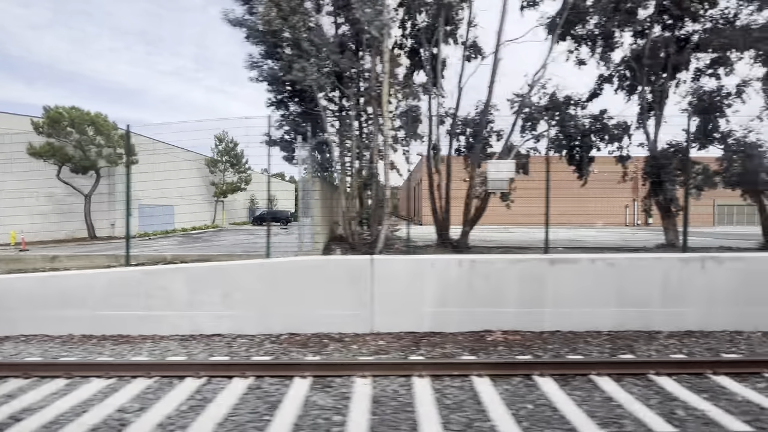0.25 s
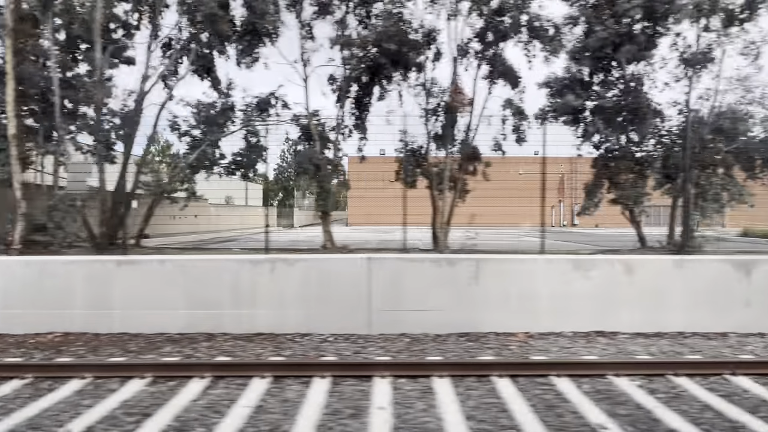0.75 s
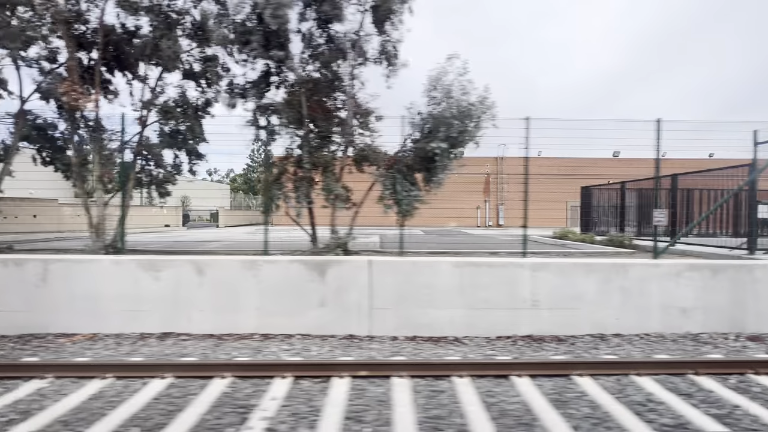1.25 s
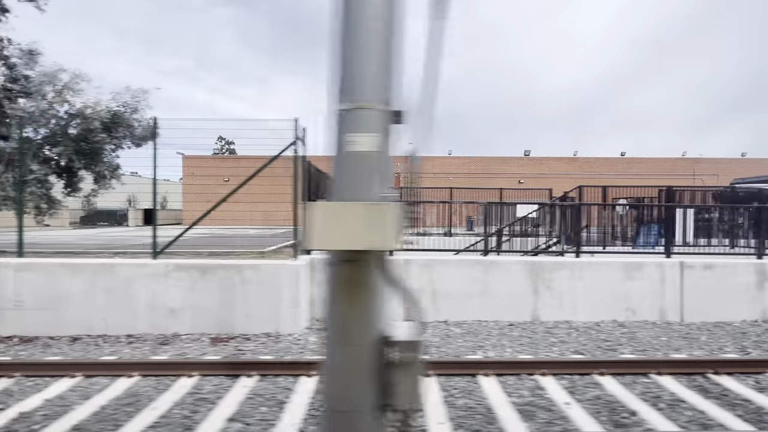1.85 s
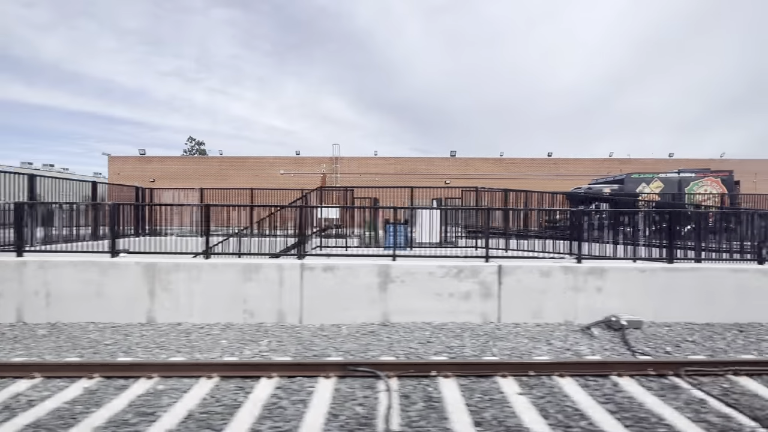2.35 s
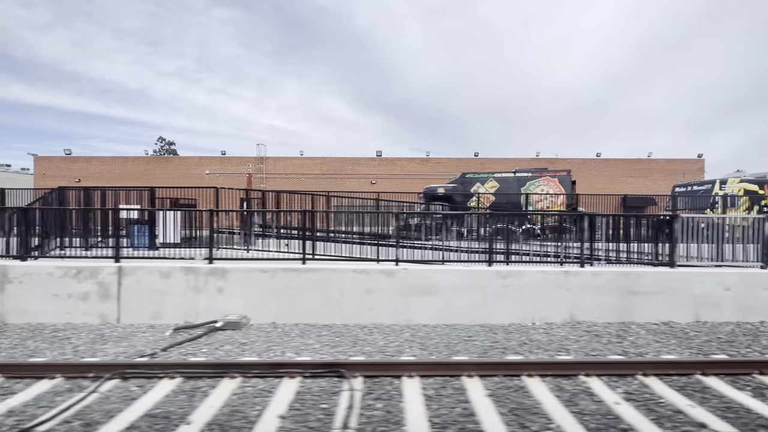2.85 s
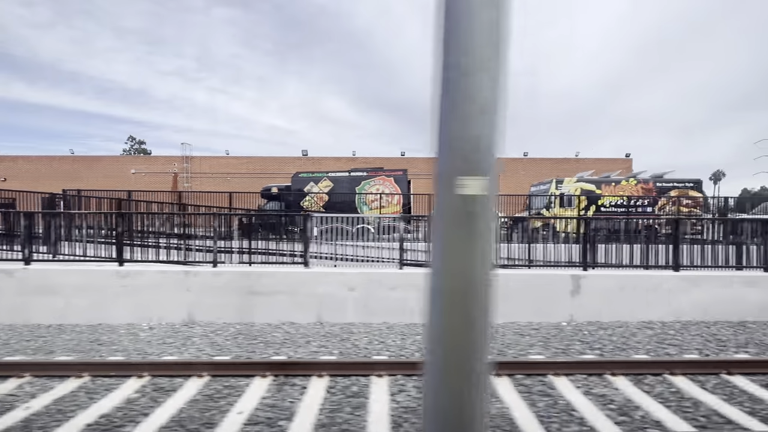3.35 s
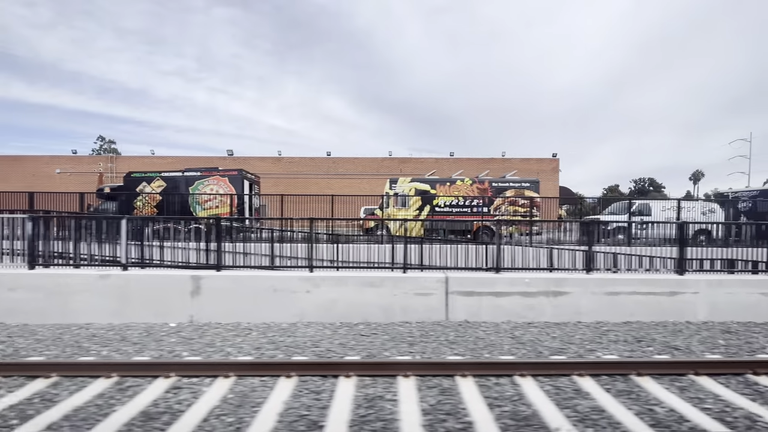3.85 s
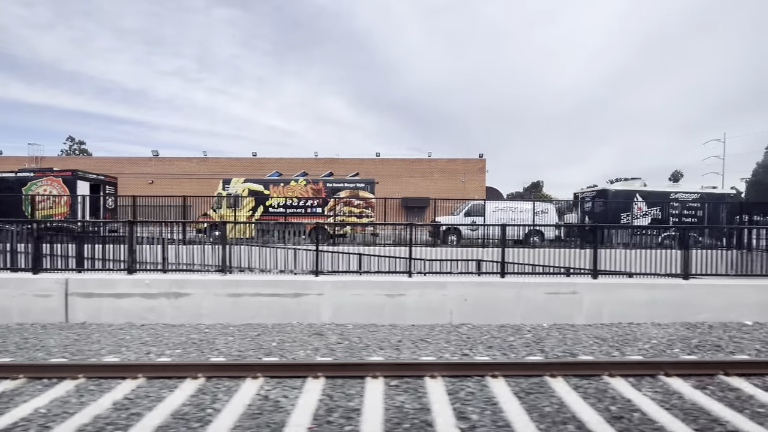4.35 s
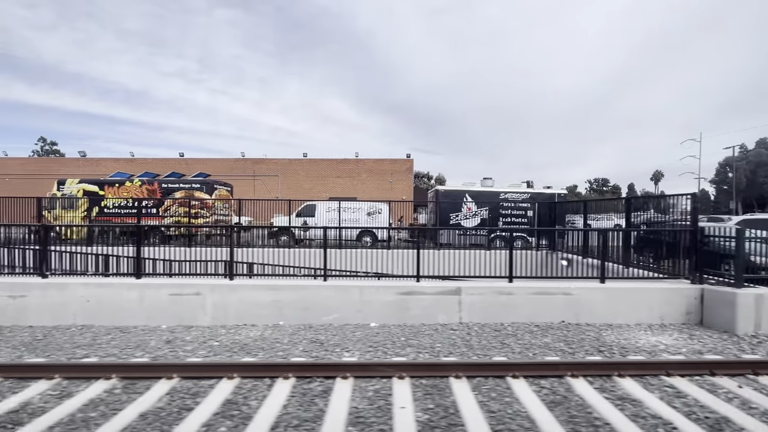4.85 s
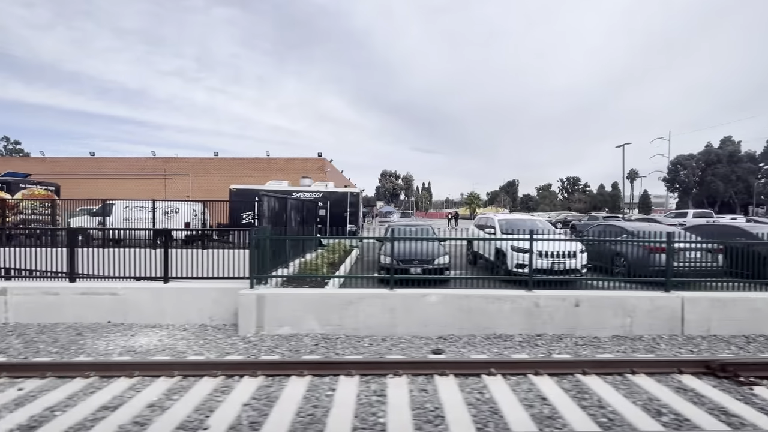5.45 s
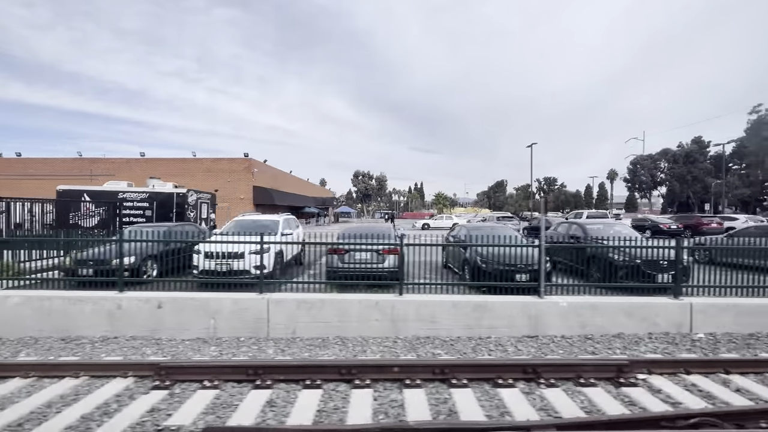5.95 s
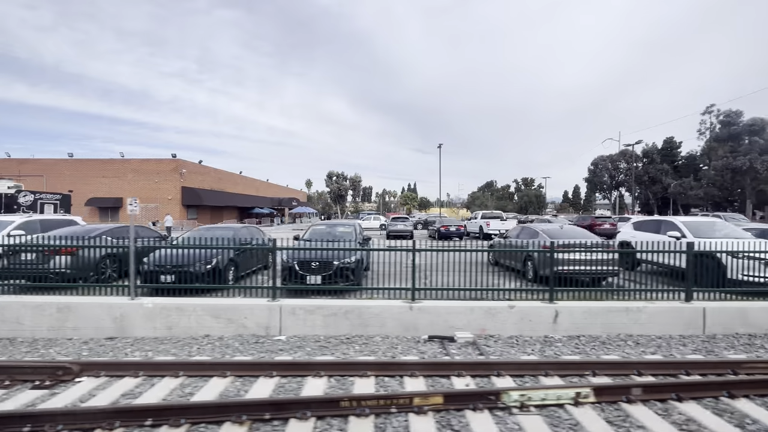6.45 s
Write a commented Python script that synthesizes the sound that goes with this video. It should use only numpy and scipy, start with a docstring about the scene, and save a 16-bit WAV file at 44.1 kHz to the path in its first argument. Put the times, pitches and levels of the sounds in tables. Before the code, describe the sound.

Inside a moving light rail car, deep rumble and low hum, clusters of heavy wheel thuds and knocks, steady air hiss, faint trim ticks.

```python
"""Inside a light rail car at steady speed. Rough rail excites the low modes of the cabin, which boom over a wavering hum;
impulses at uneven stretches thud, knock and heave the body, and corrugated rail makes the wheels sing.
Rails and wheels roar in the middle range as resonantly filtered noise that flutters and wanders in pitch.
Ventilation and passing air hiss evenly, with a thin sizzle above; a loose piece of trim squeaks once
and ticks very slightly to the right."""
import sys
import numpy as np
from scipy import signal
from scipy.fft import rfft, irfft, next_fast_len
from scipy.io import wavfile
from scipy.ndimage import uniform_filter1d, map_coordinates

SR = 44100
rng = np.random.default_rng(int(sys.argv[2]) if len(sys.argv) > 2 else 0)


def to_wav(s):
    """Save 16-bit WAV."""
    ch = np.atleast_2d(s).T  # columns
    pcm = np.round(np.clip(ch, -1, 1) * 32767)  # PCM
    wavfile.write(sys.argv[1], SR, pcm.astype(np.int16))


N = 295470

# roughness of the plain rail, smoother at the end: (time [s], level [dB])
RAIL_ROUGHNESS = [(0, -3), (.4, 5.5), (.53, 0.5), (.7, 0.5), (1.25, 2), (1.36, 0.5), (1.5, 1), (1.7, 2.5),
                  (1.9, -1.5), (2.3, 0), (2.8, 0), (3.05, -1), (3.5, 3.5), (3.78, 1), (4.2, 5.5),
                  (4.42, -2), (4.7, 4), (5.22, -0.5), (5.6, 1.5), (5.78, -1.5), (6.0, -4.5), (6.7, -5.5)]
# rolling roar of wheels and rails: (time [s], level [dB])
ROLLING_ROAR = [(0, -30.5), (.7, -26.5), (1.25, -27.5), (1.55, -28), (1.95, -27.5), (2.7, -27),
                (3.7, -30.5), (4.5, -29), (5.3, -30), (6.7, -31.5)]
# bogies on uneven stretches:
# (start [s], hold [s], cabin boom level [dB], floor growl level [dB], wheel roar level [dB])
UNEVEN_STRETCHES = [(0.01, 0.32, -23.5, -21, -36.5), (0.6, 0.084, -32, -27, -24),
                    (0.737, 0.12, -21, -22, -27), (0.875, 0.13, -39, -22.5, -27.5),
                    (1.556, 0.056, -21, -35, -50), (2.177, 0.06, -18.5, -27, -31),
                    (2.644, 0.058, -23, -35, -44), (3.862, 0.42, -26, -28.5, -47),
                    (4.448, 0.13, -20, -25, -38), (4.566, 0.22, -36, -21, -34),
                    (5.245, 0.072, -38, -36, -47), (5.825, 0.021, -18, -49, -49)]
# a wheel strikes a weld or dip: (time [s], low thud reference level [dB], steel knock force level [dB])
WHEEL_BLOWS = [(0.146, -12.5, -19), (0.183, -12, -29), (0.226, -9.5, -34), (0.286, -17, -28),
               (0.342, -13, -27), (0.431, -17, -35), (0.628, -7, -19.5), (0.659, -8.5, -26),
               (0.742, -8, -24), (0.778, -8.5, -17), (0.803, -9, -18.5), (0.91, -11.5, -24),
               (0.974, -14, -27), (1.3, -12.5, -31), (1.403, -8, -29), (1.461, -12, -36),
               (1.564, -15.5, -41), (2.184, -26, -31), (2.535, -11.5, -30), (3.88, -13, -39),
               (3.949, -11.5, -30), (4.007, -21, -37), (4.091, -6.5, -28), (4.115, -8.5, -21),
               (4.186, -12, -40), (4.227, -18, -36), (4.312, -14, -39), (4.362, -13, -34),
               (4.585, -8, -20.5), (4.639, -4.5, -26), (4.72, -12, -25), (4.753, -12.5, -22),
               (4.831, -9.5, -24), (4.915, -14.5, -34), (5.264, -15, -36), (5.324, -14.5, -36),
               (5.425, -11.5, -37), (5.523, -17.5, -33), (5.837, -31, -45)]
# the car body drops onto its springs: (time [s], force level [dB])
BODY_DROPS = [(0.325, -9.5), (0.68, -19), (0.915, -9.5), (1.11, -17), (1.41, -17), (1.69, -18),
              (1.8, -22.5), (2.1, -19), (2.48, -17), (2.84, -17.5), (2.97, -16.5), (3.7, -20), (4.1, -8.5),
              (4.905, -14), (5.31, -16), (5.63, -22)]
# corrugated patches of rail; the length is two standard deviations of a Gaussian crossing:
# (middle [s], length [s], pitch [Hz], waver [Hz], level [dB])
CORRUGATED_PATCHES = [(0.065, 0.079, 110.4, 6.9, -14), (0.26, 0.27, 109.1, 4.1, -16),
                      (0.7, 0.14, 166.8, 12, -21), (0.791, 0.08, 305, 22, -20.5),
                      (0.835, 0.24, 401, 24, -28), (0.767, 0.32, 694.3, 24, -28.5),
                      (0.899, 0.2, 762, 23.5, -31.5), (0.816, 0.13, 955, 50.6, -28),
                      (0.739, 0.26, 1295, 70, -37), (1.201, 0.15, 755, 10, -31),
                      (1.401, 0.14, 935, 15, -37), (1.98, 0.32, 776, 44, -30), (2.0, 0.4, 935, 64, -37.5),
                      (2.36, 0.14, 103.8, 3.7, -16.5), (2.6, 0.18, 227, 12, -28),
                      (1.48, 0.2, 152, 24, -23.5), (2.719, 0.12, 100, 4.04, -20.5),
                      (2.794, 0.2, 967, 35.5, -35.5), (3.979, 0.12, 107.9, 3.4, -17.5),
                      (4.2, 0.43, 219, 13.4, -23.5), (4.42, 0.1, 680, 13, -30),
                      (4.72, 0.22, 384, 40, -29.5), (4.756, 0.28, 719, 56, -29.5),
                      (4.862, 0.2, 274.2, 12.2, -26.5), (5.44, 0.16, 214, 15.3, -27)]
# sharpest ticks of the loose trim: (time [s], force level [dB])
SHARP_TICKS = [(0.2214, -41), (0.9228, -43), (1.02, -46), (1.0755, -40), (1.305, -43), (2.27, -53),
               (2.4912, -41), (3.0061, -45), (3.94, -53), (4.1599, -42.5), (4.4677, -42), (4.565, -46),
               (4.64, -43), (4.7346, -41), (4.82, -41), (5.0973, -41), (5.2604, -42), (5.35, -41.5),
               (5.495, -42), (5.6615, -42), (5.71, -44), (6.105, -43), (6.4153, -46)]

# resonances of cabin air and floor panels: (frequency [Hz], width [Hz], lift [dB])
CABIN_MODES = [(52.2, 3.9, 7), (65, 11, 7), (95.6, 8.3, 3), (108.6, 7.6, 5), (136.2, 11, 6.5),
               (164.8, 11.3, 5), (197.5, 18, 3), (222, 31.5, 6), (271, 10.7, 5.5), (308, 14, 6.5),
               (354.5, 17, 4), (412.6, 15, 4.5)]
# resonances of wheels and rails: (frequency [Hz], width [Hz], lift [dB])
WHEEL_MODES = [(676, 57, 5.5), (770, 64, 5.5), (948, 42, 5.5), (1010, 45, 4.5), (1110, 35, -2),
               (1550, 90, 1)]
# resonances of air duct and vent grille: (frequency [Hz], width [Hz], lift [dB])
GRILLE_MODES = [(329.6, 22, 4.5), (411.5, 14, 5), (1810, 160, 3), (2024, 100, 4.5), (2220, 220, 2.5),
                (4786, 130, 7), (5070, 130, 5.5), (8665, 100, -1.5)]
# ring of the trim: (frequency [Hz], width [Hz], lift [dB])
TRIM_MODES = [(4810, 320, 14), (8800, 300, 7)]

# broad spectra, before the resonances: (frequency [Hz], relative level [dB per Hz])
BOOM_SPECTRUM = [(12, -56), (25, -29), (36, -12), (50, -11.5), (68, -6), (82, -6.5), (112, -3), (135, -16),
                 (180, -21.5), (400, -71)]
GROWL_SPECTRUM = [(70, -34), (110, -15.5), (145, 3.5), (190, -1.5), (270, -6), (400, -10), (520, -17.5),
                  (800, -21), (2000, -71.5)]
ROAR_SPECTRUM = [(200, -23), (400, -0.5), (540, 0), (700, -3), (900, -5), (1200, -4), (1600, -13),
                 (2400, -23.5), (5000, -57.5)]
JOLT_SPECTRUM = [(30, -41), (70, -5), (130, 5.5), (220, -0.5), (330, -10), (900, -35), (4000, -59)]
SHUDDER_SPECTRUM = [(20, -60), (55, -6.5), (110, -3.5), (170, 4.5), (250, -7), (330, -19), (800, -38.5),
                    (4000, -73)]
KNOCK_SPECTRUM = [(150, -17), (350, 12.5), (550, -11.5), (750, 2.5), (1250, -5), (1800, -13), (4000, -49)]
HEAVE_SPECTRUM = [(18, -57), (35, -13.5), (55, 2.5), (72, -3), (130, -24.5), (400, -65)]
HISS_SPECTRUM = [(22, -18), (70, 9), (135, -3.5), (230, 7), (360, 7.5), (550, -3.5), (1000, 2),
                 (1500, -0.5), (2250, -6.5), (2700, -11), (3600, -13), (4400, -18), (6100, -21),
                 (7600, -30), (8700, -27), (10500, -36), (12000, -66.5)]
TICK_SPECTRUM = [(1500, -22), (3500, -17), (5000, 6.5), (7600, 0), (8700, 1), (10600, -5), (12000, -9)]

# likeness of the field at left and right, limited to +-0.99: (frequency [Hz], correlation [1])
FIELD_CORRELATION = [(50, 3), (75, 6.5), (110, 3.4), (170, 0.4), (235, 0.66), (330, -0.53), (390, 0.04),
                     (580, -0.5), (820, 0), (1450, -.5), (1950, 0.26), (3800, -0.13), (4800, 0.15),
                     (7700, -0.4), (9000, 0)]
# left minus right: (frequency [Hz], level difference [dB])
FIELD_BALANCE = [(62, -1.9), (140, -0.6), (220, 0), (320, 0), (700, 0), (1150, 4.5), (2000, 4), (2600, 1.5),
                 (4200, 4), (4900, 9.5), (6000, 10), (7400, -0.5), (8600, -6), (10200, -10.5)]

BOOM_DB, GROWL_DB = -24.5, -26.5  # on rail of roughness 0 dB
WHEEL_TURN_HZ, THROB_DB = 6.3, 0.5  # slightly oval wheels press harder once a turn
SURGE_ATTACK_S, SURGE_RELEASE_S = 0.017, 0.048
JOLT_DB, SHUDDER_DB = -1, -2.5  # relative to each low thud's reference level
HUM_HZ, HUM_DB = 97, -3.5  # level relative to the boom
HUM_FLUTTER_DB, HUM_WAVER = 4, 0.02597  # spread of its level, and of its pitch as a share
AIR_DB = -28.5  # settled ventilation
RUSH_DB, RUSH_FADE_S = 2, 0.69  # the air is a little louder at first and settles
SIZZLE_DB, SIZZLE_HOLD_S, SIZZLE_FADE_S = -50, 0.29, 0.12  # a bright hiss at first
SIZZLE_SHAKE_DB = -61.5  # the part kept up by the shaking floor, at shake 1
SQUEAK_S, SQUEAK_HZ, SQUEAK_DB = 0.21, 4740, -35  # force level; the trim rubs once
CEILING, TOP_HZ = 0.92, 10850  # peak amplitude limit, and edge of the pass band


def ride():
    """Superposed power: plain rail and uneven stretches add; the bass throbs at the wheels' rotation rate."""
    t = np.arange(N) / SR
    rough_db = curve(RAIL_ROUGHNESS)
    plain_db = [BOOM_DB + rough_db, GROWL_DB + rough_db, curve(ROLLING_ROAR)]
    power = undb(plain_db) ** 2
    for start, hold, *levels_db in UNEVEN_STRETCHES:
        attack = np.clip((t - start) / SURGE_ATTACK_S, 0, 1)
        release = np.exp(-np.maximum(t - start - hold, 0) / SURGE_RELEASE_S)
        power = power + np.outer(undb(levels_db), attack * release) ** 2
    boom, growl, roar = np.sqrt(power)
    throb = undb(THROB_DB * np.cos(2 * np.pi * WHEEL_TURN_HZ * t))
    return boom * throb, growl * throb, roar


def running_gear(boom_gain, growl_gain, roar_gain):
    """Forced vibration: rail roughness drives the cabin air, the floor panels and the wheels themselves."""
    boom = colour(sound_field(noise()), BOOM_SPECTRUM, CABIN_MODES)
    boom = sustained(boom, span_s=0.15)
    # the floor panels are shaken in uneven jolts
    jolts = noise() * undb(2.1 * walk(rate=45))
    growl = colour(sound_field(jolts), GROWL_SPECTRUM, CABIN_MODES)
    growl = sustained(growl, span_s=0.17)
    # the contact patch shifts on the tread, so the roar wavers and turns gritty
    roar = colour(sound_field(noise()), ROAR_SPECTRUM, WHEEL_MODES)
    roar = wander(roar, share=0.012, rate=9)
    roar = flutter(roar, depth_db=2.5, rate=24, count=12)
    roar = sustained(roar, span_s=0.24) * undb(0.5 * walk(rate=55))
    return boom * boom_gain + growl * growl_gain + roar * roar_gain


def wheel_thuds():
    """Impulsive excitation: blows jolt and shudder the cabin and knock the wheels; body drops make it heave."""
    lows = [(s, low_db) for s, low_db, _ in WHEEL_BLOWS]
    highs = [(s, knock_db) for s, _, knock_db in WHEEL_BLOWS]
    shudder_force = blows(lows, rise_s=0.0034, t60_s=0.18) * undb(SHUDDER_DB)
    knock_force = blows(highs, rise_s=0.0028, t60_s=0.17)
    heave_force = blows(BODY_DROPS, rise_s=0.009, t60_s=0.3)
    jolts = jolt(lows, JOLT_SPECTRUM, CABIN_MODES) * undb(JOLT_DB)
    shudders = strike(shudder_force, SHUDDER_SPECTRUM, CABIN_MODES)
    knocks = strike(knock_force, KNOCK_SPECTRUM, WHEEL_MODES)
    heaves = strike(heave_force, HEAVE_SPECTRUM, CABIN_MODES)
    return jolts + shudders + knocks + heaves


def rail_song():
    """Periodic excitation: wheels sing while crossing rail-head ripples; long ones drone, short ones howl."""
    t = np.arange(N) / SR
    song = np.zeros((2, N))
    for middle, length, hz, waver_hz, db in CORRUGATED_PATCHES:
        near = np.abs(t - middle) < 2 * length
        age = t[near] - middle
        crossing = np.exp(-(2 * age / length) ** 2 / 2) * undb(db)
        for side, uneven in enumerate(rng.standard_normal(size=(2, 128))):
            knots = (np.arange(len(uneven)) - len(uneven) / 2) / waver_hz
            pitch = hz + waver_hz / 2 * np.interp(age, knots, uneven)
            cycles = np.cumsum(pitch) / SR + rng.random()
            song[side, near] += np.sqrt(2) * crossing * np.sin(2 * np.pi * cycles)
    return sound_field(song)


def cabin_hum(boom_gain):
    """Tonal hum: a low sine near 97 Hz wavers in pitch, falters, and swells with the boom."""
    pitch = HUM_HZ * (1 + HUM_WAVER * walk(rate=8))
    phase = 2 * np.pi * np.cumsum(pitch) / SR
    hum = unit(np.sin(phase) * undb(HUM_FLUTTER_DB * walk(rate=20)))
    return hum * boom_gain * undb(HUM_DB)


def trim_rattle(shake, pan_db, chatter_db, spread_db, follow):
    """Contact noise: loose trim ticks sharply, and chatters at random, louder the harder the floor shakes."""
    chance = rng.random((150, 2))
    times = chance[:, 0] * (N - 1) / SR
    shake_db = 20 * np.log10(shake[(times * SR).astype(int)])
    sizes_db = chatter_db + spread_db * chance[:, 1] + follow * shake_db
    ticks = blows(SHARP_TICKS, rise_s=0.00049, t60_s=0.087)
    chatter = blows(zip(times, sizes_db), rise_s=0.00036, t60_s=0.088)
    lean = undb(np.array([[pan_db], [-pan_db]]) / 2)
    ring = unit(colour(noise(), TICK_SPECTRUM, TRIM_MODES) * lean)
    return np.hypot(ticks, chatter) * ring


def trim_squeak():
    """Friction noise: a brief, thin squeak of plastic on metal, as noise with one narrow resonance."""
    spectrum = [(2500, -27), (3700, -5), (5200, -9), (8000, -24), (11000, -36)]
    rub = unit(colour(noise(), spectrum, [(SQUEAK_HZ, 200, 14)]))
    return rub * blows([(SQUEAK_S, SQUEAK_DB)], rise_s=0.008, t60_s=0.14)


def ventilation():
    """Flow noise: turbulent air hisses through the vents and along the windows."""
    hiss = colour(sound_field(noise()), HISS_SPECTRUM, GRILLE_MODES)
    hiss = flutter(hiss, depth_db=1.0, rate=16)
    hiss = reflections(hiss, db=-16.5, t60_s=0.15)
    rush_db = RUSH_DB * np.exp(-np.arange(N) / SR / RUSH_FADE_S)
    return hiss * undb(AIR_DB + rush_db)


def sizzle(shake):
    """Amplitude-modulated noise: a thin high hiss soon dies down and stirs again as the floor shakes."""
    fade = np.exp(-np.maximum(np.arange(N) / SR - SIZZLE_HOLD_S, 0) / SIZZLE_FADE_S)
    gain = np.hypot(undb(SIZZLE_DB) * fade, undb(SIZZLE_SHAKE_DB) * shake)
    spectrum = [(2500, -12.0), (4800, 5.5), (8000, -1.0), (11000, -12)]
    return unit(colour(sound_field(noise()), spectrum)) * gain


def blows(table, rise_s, t60_s):
    """Transient force: each blow builds quickly and decays exponentially."""
    force = np.zeros(N)
    age = np.arange(SR) / SR
    shape = (1 - np.exp(-age / rise_s)) * undb(-60 * age / t60_s)
    for s, db in table:
        start = max(int(s * SR), 0)
        force[start:start + SR] += undb(db) * shape[:N - start]
    return force


def jolt(table, spectrum, modes):
    """Impulse response: each clean push alone peaks at its level and rings on in the modes."""
    pushes = np.zeros(N)
    for s, db in table:
        pushes[int(s * SR)] += undb(db)
    lone, struck = colour(np.array([signal.unit_impulse(N), pushes]), spectrum, modes)
    return struck / np.max(np.abs(lone))


def strike(force, spectrum, modes):
    """Resonant response: a noisy shudder follows the force and rings on in the modes."""
    shudder = sustained(colour(sound_field(noise()), spectrum), span_s=0.018)
    flat = [(1, 0), (SR, 0)]
    steady, struck = colour(np.array([shudder, shudder * force]), flat, modes)
    return struck / np.std(steady)  # unforced shudder sets the reference level


def flutter(x, depth_db, rate, count=18):
    """Turbulence: neighbouring bands swell and fade independently; the outer two take in all beyond them."""
    centres = np.geomspace(400, 400 * 1.2 ** count, count)
    size = next_fast_len(N)
    spectrum = rfft(x, size)
    hz = np.arange(size // 2 + 1) * SR / size
    out = 0
    for band in np.eye(count):
        part = irfft(spectrum * np.interp(hz, centres, band), size)[:, :N]
        out = out + part * undb(depth_db * walk(rate))
    return out


def wander(x, share, rate):
    """Frequency modulation: uneven reading speed shifts all pitches by a small random share."""
    place = np.arange(N) + np.cumsum(share * walk(rate))
    return np.array([map_coordinates(channel, [place], order=3, mode="mirror") for channel in x])


def reflections(x, db, t60_s):
    """Reverberation: windows and walls add a short, dense echo, a little hollow."""
    age = np.arange(SR // 5) / SR
    tail = rng.standard_normal((2, len(age))) * undb(-60 * age / t60_s)
    tail *= undb(db) / np.sqrt(np.sum(tail ** 2, axis=1, keepdims=True))
    return unit(x + signal.fftconvolve(x, tail, axes=1)[:, :N])


def sound_field(pair):
    """Spatial coherence: two signals are mixed to the field's left-right correlation and balance."""
    likeness = np.clip(across(FIELD_CORRELATION), -0.99, 0.99)
    mid, side = rfft(pair) * np.sqrt([1 + likeness, 1 - likeness])
    lean = undb(across(FIELD_BALANCE))
    return irfft(np.array([(mid + side) * lean, mid - side]) / np.sqrt(1 + lean ** 2), N)


def colour(x, spectrum, modes=()):
    """Minimum-phase filtering: a broad spectrum with resonances that ring on after each push."""
    hz = np.arange(N // 2 + 1) * SR / N
    db = across(spectrum) + sum(lift / (1 + (2 * (hz - f) / width) ** 2) for f, width, lift in modes)
    # folding the cepstrum onto positive time makes the filter causal
    cepstrum = irfft(np.log(undb(db)), N)
    cepstrum[1:N // 2] *= 2
    cepstrum[N // 2 + 1:] = 0
    return irfft(rfft(x) * np.exp(rfft(cepstrum)), N)


def sustained(x, span_s):
    """Power normalisation: hold unit mean power over span_s, keeping quicker beating."""
    power = uniform_filter1d(np.mean(x ** 2, axis=0), max(int(span_s * SR), 2))
    return x / np.sqrt(power)


def walk(rate):
    """Slow random modulation: levels held 1 / rate s and slewed, scaled to rms 1."""
    hold = max(int(SR / rate), 2)
    steps = np.repeat(rng.standard_normal(N // hold + 1), hold)
    return unit(uniform_filter1d(steps, hold)[:N])


def noise():
    """White noise: two uncorrelated channels."""
    return rng.standard_normal((2, N))


def across(points):
    """Spectral interpolation: points joined on a log-frequency axis, at every bin."""
    hz, value = np.transpose(points)
    bins_hz = np.maximum(np.arange(N // 2 + 1) * SR / N, 1)
    return np.interp(np.log(bins_hz), np.log(hz), value)


def curve(table):
    """Linear interpolation in time: a timed level at every sample."""
    s, level = np.transpose(table)
    return np.interp(np.arange(N) / SR, s, level)


def undb(db):
    """Logarithmic level: decibels to amplitude gain."""
    return 10 ** (np.asarray(db) / 20)


def unit(x):
    """Root mean square: scale to rms 1."""
    return x / np.sqrt(np.mean(x ** 2))


def scene():
    """Superposition: track, air and trim add in the cabin."""
    boom, growl, roar = ride()
    shake = growl / undb(GROWL_DB)  # near 1 on rail of roughness 0 dB
    track = running_gear(boom, growl, roar) + wheel_thuds() + rail_song() + cabin_hum(boom)
    air = ventilation() + sizzle(shake)
    rattle = trim_rattle(shake, pan_db=-0.5, chatter_db=-55.0, spread_db=6.5, follow=0.33)
    return track + air + trim_squeak() + rattle


def record(dry):
    """Soft saturation rounds the loudest peaks; an elliptic low-pass cuts the top."""
    rounded = dry / (1 + (dry / CEILING) ** 6) ** (1 / 6)
    low_pass = signal.ellip(8, 0.2, 70, TOP_HZ, fs=SR, output="sos")
    return signal.sosfilt(low_pass, rounded)


dry = scene()
out = record(dry)
to_wav(out)
```